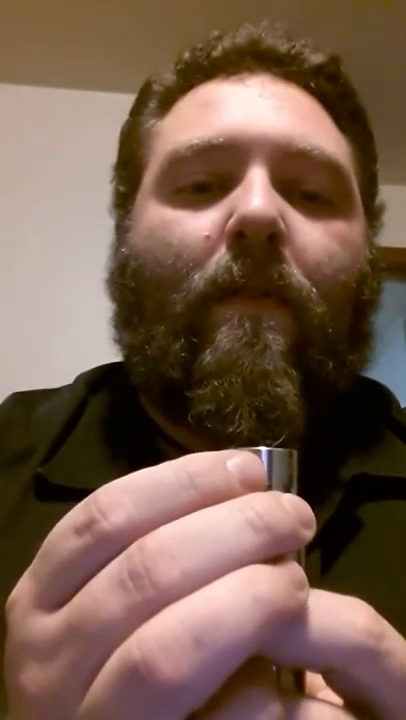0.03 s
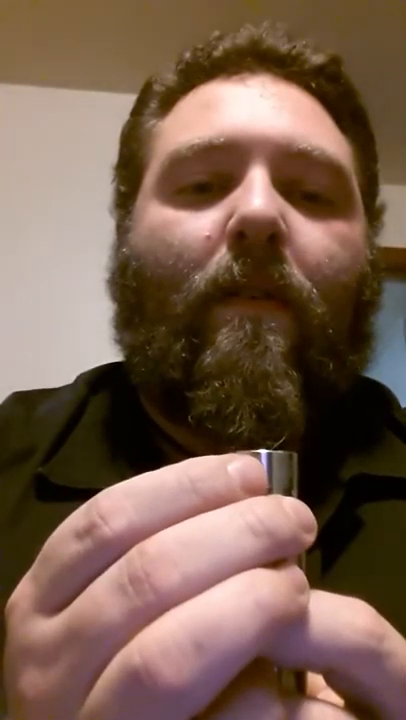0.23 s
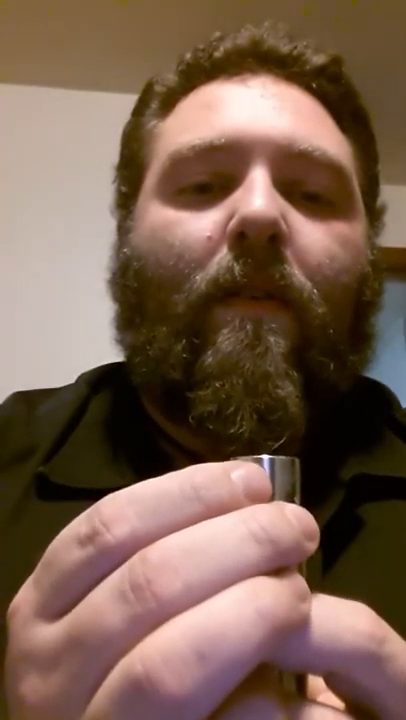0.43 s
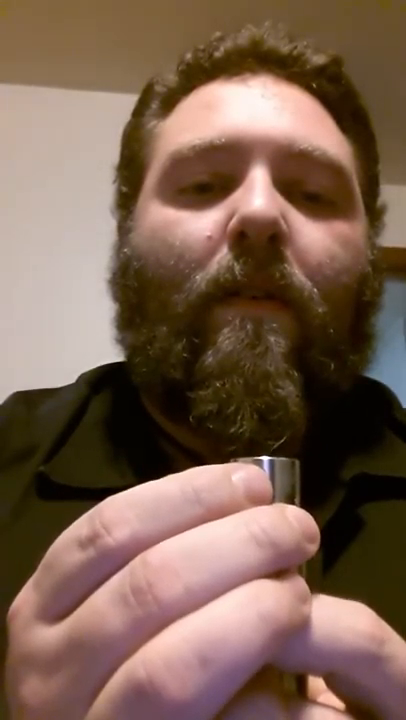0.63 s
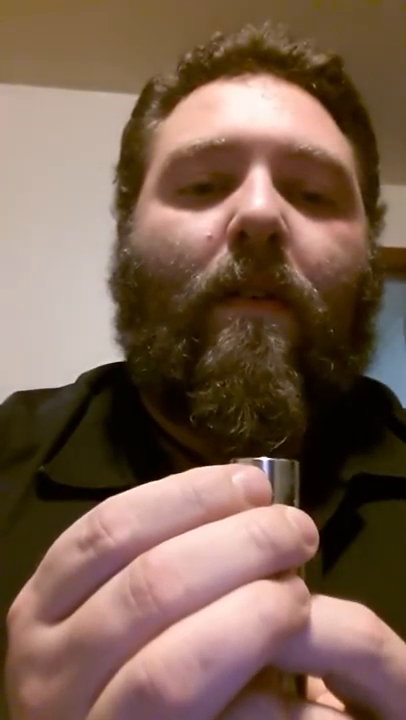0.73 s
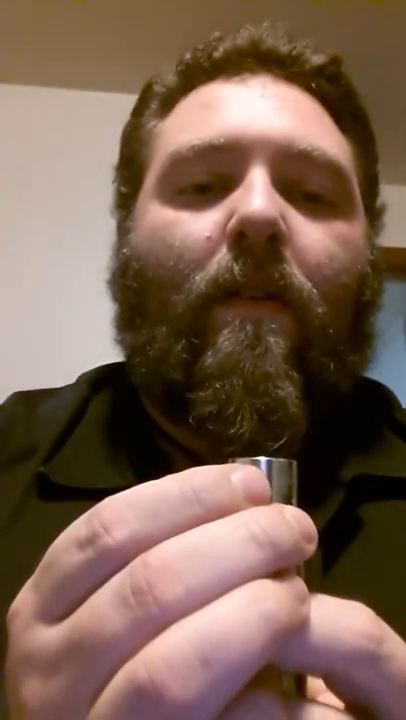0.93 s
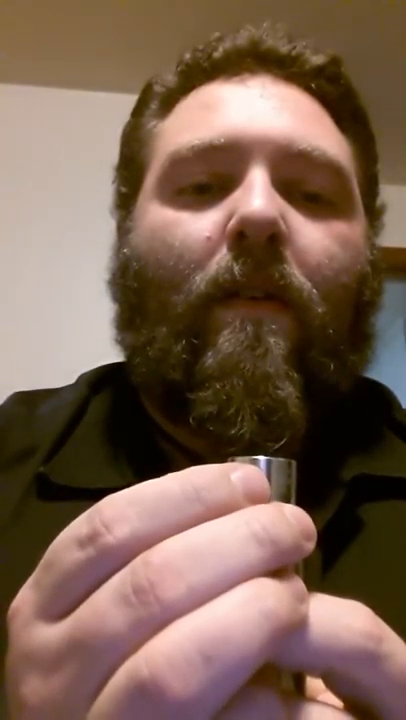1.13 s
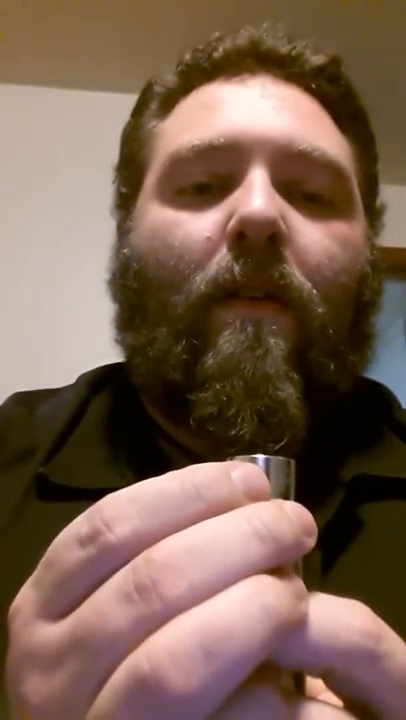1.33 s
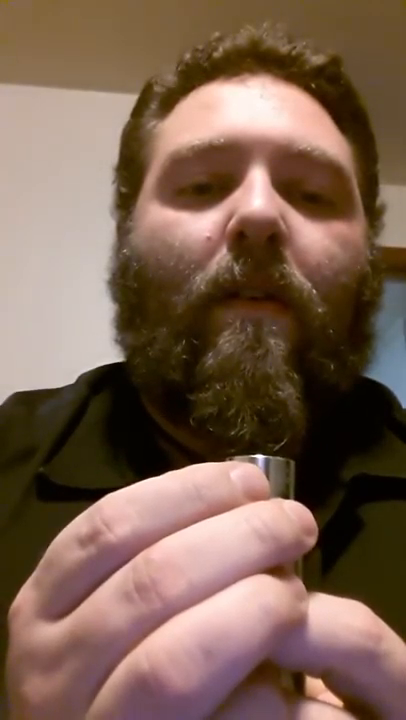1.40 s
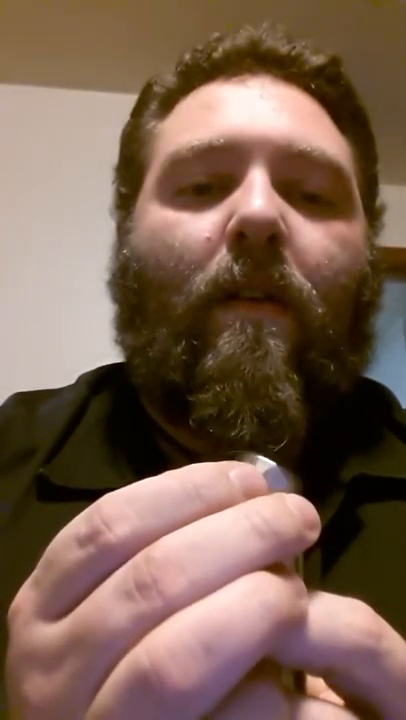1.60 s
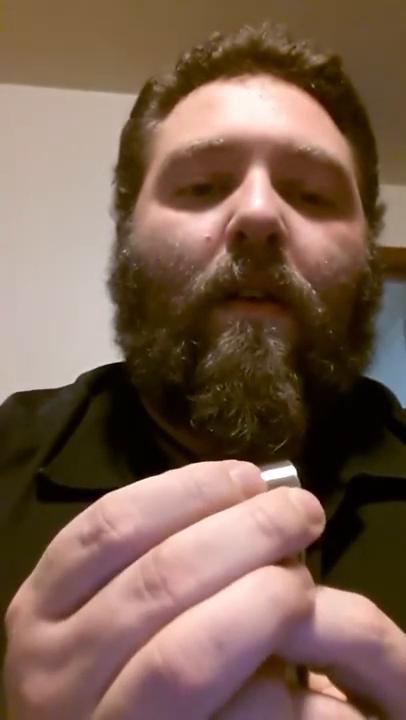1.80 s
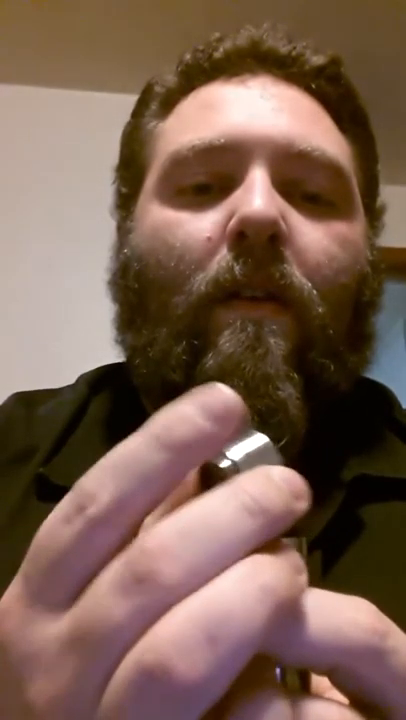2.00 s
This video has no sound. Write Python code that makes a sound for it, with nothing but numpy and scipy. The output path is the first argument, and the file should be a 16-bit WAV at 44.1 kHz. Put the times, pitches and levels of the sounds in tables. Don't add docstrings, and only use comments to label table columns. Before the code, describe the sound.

Two sharp metallic clicks as small steel parts snap together magnetically in a quiet room

```python
import sys
import numpy as np
from scipy import signal
from scipy.fft import rfft, irfft
from scipy.io import wavfile
from scipy.ndimage import uniform_filter1d

SR = 44100
rng = np.random.default_rng(int(sys.argv[2]) if len(sys.argv) > 2 else 0)


def how_loud(loudness_db):
    steps = np.asarray(loudness_db, float) / 20
    return 10 ** steps


def unload_wav(signal):
    wavfile.write(
        sys.argv[1],
        SR,
        np.round(np.clip(np.atleast_2d(signal).T, -1, 1) * 32767).astype(np.int16),
    )


N = 90493


def unit(x):
    return x / np.sqrt(np.mean(x ** 2))


def band(x, hz, width):
    return signal.lfilter(*signal.iirpeak(hz, hz / max(width, 1), fs=SR), x)


def ring(x, hz, t60):
    pole = np.exp(2j * np.pi * hz / SR - np.log(1000) / (t60 * SR))
    return signal.lfilter([1], [1, -pole], x).imag


def walk(rate):
    hold = int(SR / rate)
    steps = np.repeat(rng.standard_normal(N // hold + 1), hold)
    return uniform_filter1d(uniform_filter1d(steps, hold), hold)[:N]


def colour(points, channels):
    hz, db = np.array(points, float).T
    f = np.maximum(np.arange(N // 2 + 1) * SR / N, 1)
    gain = how_loud(np.interp(np.log(f), np.log(hz), db, -80, -80))
    return unit(irfft(rfft(rng.standard_normal((channels, N))) * gain, N))


def ports(both, lag=14):
    return np.array([both[0], np.roll(both[1], lag)])


def gate(t):
    # opening in seconds, hold in seconds, closing time in seconds, lift in dB
    openings = [
        (1.637, 0.073, 0.051, 12.5),
        (1.853, 0.037, 0.027, 12.5),
    ]
    lift = 0
    for s, hold, close, db in openings:
        closing = np.exp(-(np.maximum(t - s - hold, 0) / close) ** 2)
        lift = lift + db * (t > s) * closing
    return how_loud(lift)


def steel(push, modes):
    out = 0
    for k, (hz, t60, left, right) in enumerate(modes):
        mode = band(ring(push, hz, t60), hz, hz * 0.33)
        out = out + (-1) ** k * how_loud([[left], [right]]) * mode
    return out


def contacts(t):
    contact_s = [1.6503, 1.6558, 1.6573, 1.6622, 1.6642, 1.6660, 1.6711, 1.6756, 1.6822, 1.6870, 1.6895,
                 1.8522, 1.8535, 1.8566, 1.8610, 1.8656, 1.8677, 1.8746, 1.8770, 1.8848, 1.278]
    # left level in dB, right level in dB, weight of the shell in dB, pitch of the pin in Hz
    strengths = [(-13, -26, 3, 4390), (-18, -38, -1, 4280), (-22, -38, -9, 4400), (-29, -44, 0, 3900),
                 (-29, -42, 3, 4500), (-39.5, -46, 15, 4500), (-25, -37, 0, 4500), (-31, -43, 2.5, 4390),
                 (-21.5, -44, 3, 4500), (-27.5, -46, -4, 4770), (-30, -46, 7, 4500), (-44, -65, -1, 4700),
                 (-52, -62, -7, 4400), (-24, -46, -25, 4560), (-49, -58, -6, 4600), (-41, -56, -17, 4500),
                 (-42, -61, -11, 4650), (-39, -60, -10, 4650), (-36, -62, -10, 4500), (-44, -63, -4, 4630),
                 (-60.5, -75, -9, 4650)]
    rise_s, t60_s = 0.00052, 0.0061
    pin, shell = np.zeros((2, 2, N))
    u = t[:1500]
    swell = (1 - np.exp(-u / rise_s)) * how_loud(-60 * (u / t60_s) ** 2)
    for s, (left, right, shell_db, hz) in zip(contact_s, strengths):
        i = int(s * SR)
        tone = np.sin(2 * np.pi * hz * u) + how_loud(-18.5) * np.sin(2 * np.pi * hz * 1.05 * u)
        pin[:, i:i + len(u)] += 2 * how_loud([[left], [right]]) * swell * tone
        shell[:, i] += how_loud(left + shell_db)
    return pin, shell


def cracks():
    snap_s = [
        1.6503,
        1.8566,
        1.6822,
        1.6558,
    ]
    # left level in dB, right level in dB
    snap_db = [(-11, -18.5), (-34, -38), (-28.5, -38), (-32, -47)]
    # mode in Hz, t60 in seconds, left level in dB, right level in dB
    crack_modes = [(1336, 0.0074, -24, -21), (2083, 0.013, -5.5, -12), (2600, 0.0068, -6.5, -14.5),
                   (3190, 0.0065, -4, -7), (3850, 0.006, -6.5, -2), (4500, 0.0035, -5, -6.5),
                   (6110, 0.0053, -30, -4), (10950, 0.01, -32.5, -30), (13500, 0.0057, -35, -28)]
    snap = np.zeros((2, N))
    for s, levels in zip(snap_s, snap_db):
        snap[:, int(s * SR)] += how_loud(levels)
    return 2 * steel(snap, crack_modes)


def tails(t):
    # start in seconds, level in dB, t60 in seconds, weight of the low shell ring in dB
    tail_rows = [
        (1.653, -34, 0.26, 5.5),
        (1.854, -46.5, 0.24, -8),
    ]
    rise_s, chatter_db = 0.005, 4.5
    noise = rng.standard_normal((2, N)) * how_loud(chatter_db * np.array([walk(280), walk(250)]))
    wide, shell = np.zeros((2, 2, N))
    for s, db, t60, shell_db in tail_rows:
        u = np.maximum(t - s, 0)
        tail = noise * gate(t) * (1 - np.exp(-u / rise_s)) * how_loud(db - 60 * u / t60)
        shell += tail * how_loud(shell_db) / 20
        wide += tail
    return wide, shell


def clicks(t):
    # mode in Hz, t60 in seconds, left level in dB, right level in dB
    shell_modes = [(2083, 0.097, -14, -23), (2130, 0.068, -17, -22), (2450, 0.018, -15.5, -24.5),
                   (2090, .016, -11.5, -8.5), (7080, 0.01, -25, -13), (1597, .01, -18.5, -39.5)]
    pin, shell = contacts(t)
    wide, shaken = tails(t)
    pin_tail = how_loud([[2.5], [-26]]) * band(band(wide, 4500, 600), 4500, 1200)
    wide_tail = how_loud(-13) * band(band(wide, 3500, 6000), 3500, 9000)
    return ports(pin + pin_tail + steel(shell + shaken, shell_modes) + cracks() + wide_tail, lag=9)


def rubs(t):
    # peak in seconds, rise in seconds, fall in seconds, thud level in dB, hiss level in dB
    moves = [(.0, .01, 0.038, -53, -67), (.497, 0.0077, .02, -59.5, -88),
             (0.767, 0.028, 0.034, -52.5, -75.5), (0.836, 0.042, 0.057, -60.5, -65.5),
             (0.909, .01, 0.0093, -66, -81), (1.28, 0.031, 0.011, -65.5, -102),
             (1.402, 0.012, 0.018, -59.5, -76), (1.437, 0.016, 0.044, -59.5, -76),
             (1.6386, 0.0013, .005, -56.5, -70), (1.665, 0.011, 0.049, -58, -86),
             (1.861, 0.0054, .02, -66, -74.5), (2.041, 0.016, 0.025, -63.5, -76)]
    # thud resonance in Hz, width in Hz, level in dB
    thud_bands = [(131, 110, 6), (223.5, 73, 10), (479, 286, 5), (974, 890, -4.5)]
    # hiss resonance in Hz, width in Hz, level in dB
    hiss_bands = [(2300, 890, -1.5), (4500, 1500, 1), (6720, 610, 2.5), (11730, 5000, -12)]
    thud_env, hiss_env = np.zeros((2, N))
    for s, rise, fall, thud_db, hiss_db in moves:
        shape = np.exp(-np.where(t < s, ((s - t) / rise) ** 2, (t - s) / fall))
        thud_env += how_loud(thud_db) * shape
        hiss_env += how_loud(hiss_db) * shape
    shared = rng.standard_normal(N)
    grain = (shared + 0.5 * rng.standard_normal((2, N))) * how_loud(1.1 * walk(150))
    thud = unit(sum(how_loud(db) * band(band(grain, hz, w), hz, 2 * w) for hz, w, db in thud_bands))
    dry_noise = rng.standard_normal((2, N)) * how_loud(2.5 * walk(90))
    hiss = unit(sum(how_loud(db) * band(dry_noise, hz, w) for hz, w, db in hiss_bands))
    return ports(thud * thud_env * how_loud([[2.5], [-2]])) + hiss * hiss_env * how_loud([[1.5], [2.5]])


def squeak(t):
    # pitch in Hz, peak in seconds, half length in seconds, level in dB
    tones = [
        (6900, 1.545, .03, -71),
        (6450, 1.56, .035, -76),
        (7550, 1.57, .05, -77),
    ]
    out = np.zeros(N)
    for hz, s, half, db in tones:
        swell = np.exp(-((t - s) / half) ** 2)
        out += how_loud(db + 3 * walk(54)) * swell * np.sin(2 * np.pi * hz * t)
    return ports(np.array([out, out]))


def knocks():
    knock_s = [
        1.6388,
        1.4295,
        1.4015,
        .7655,
        .0195,
    ]
    # mode in Hz, t60 in seconds, level in dB
    knock_modes = [(460, 0.021, -41.5), (217, 0.049, -48.5), (305, 0.024, -54), (480, .04, -48),
                   (280, 0.048, -54)]
    out = np.zeros(N)
    for s, (hz, t60, db) in zip(knock_s, knock_modes):
        tap = np.zeros(N)
        tap[int(s * SR)] = how_loud(db)
        out += band(ring(tap, hz, t60), hz, 2 * hz)
    return ports(out * how_loud([[2], [-2]]))


def appliances(t):
    # line in Hz, width in Hz, level in dB
    hum_lines = [(91.2, 14, -81), (120.9, 9.7, -78.5), (212.4, 13.3, -73.5), (9960, 120, -84.5),
                 (13300, 300, -81)]
    # motor tone in Hz, level in dB
    whine_tones = [(797, -74.5), (1116, -68)]
    hum, whine = 0, 0
    for hz, w, db in hum_lines:
        noise = rng.standard_normal(N) + 0.34 * rng.standard_normal((2, N))
        hum = hum + how_loud(db) * unit(band(band(noise, hz, w), hz, w))
    for hz, db in whine_tones:
        whine = whine + how_loud(db + walk(6.2)) * np.sin(2 * np.pi * hz * t)
    return hum, whine


def room_air():
    # frequency in Hz, density in dB per Hz
    air_spectrum = [(18, -62), (30, -26), (80, -10.5), (178, -5.5), (210, -6.5), (534, -9.5), (580, -11.5),
                    (1150, -16), (1600, -18.5), (2080, -64), (3520, -120)]
    shared, *own = colour(air_spectrum, channels=3)
    own = np.array(own)
    apart = signal.lfilter(*signal.butter(1, 900, "high", fs=SR), own) + 0.64 * band(own, 45.3, 60)
    swell_db, flicker_db = 0.7 * walk(2.1), 2 * walk(18)
    return (shared + 1.3 * apart) * how_loud(-70 + swell_db + flicker_db)


def port_hiss():
    # frequency in Hz, density in dB per Hz
    hiss_spectrum = [(760, -31), (1300, -0.5), (1340, -12.5), (1550, -5), (3040, -6.5), (13300, -10.5),
                     (15000, -28)]
    return colour(hiss_spectrum, channels=2) * how_loud(-70.5 + 0.64 * walk(9.5))


def room(t):
    hum, whine = appliances(t)
    air = room_air() + hum
    air = air + 0.53 * band(air, 312, 600) * [[1], [-0.3]]
    return ports(air + whine) + port_hiss()


def scene():
    t = np.arange(N) / SR
    return clicks(t) + rubs(t) + squeak(t) + knocks() + room(t) * gate(t)


def low_pass(x):
    return signal.sosfilt(signal.butter(12, 15730, fs=SR, output="sos"), x)


def record(dry):
    cut = signal.sosfilt(signal.ellip(8, 0.3, 60, 14600, fs=SR, output="sos"), dry)
    return low_pass(cut)


dry = scene()
out = record(dry)
unload_wav(out)
```